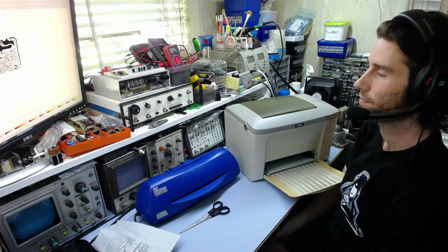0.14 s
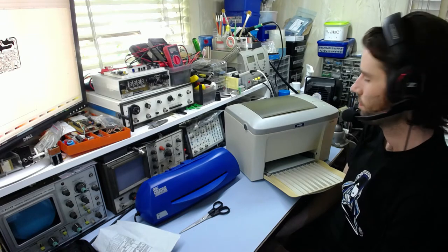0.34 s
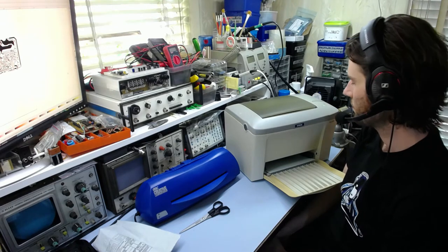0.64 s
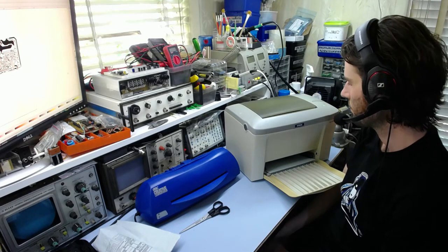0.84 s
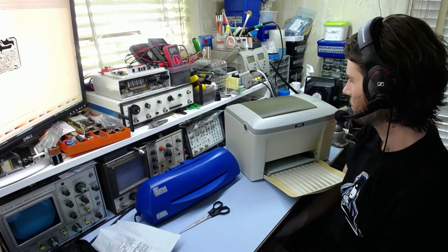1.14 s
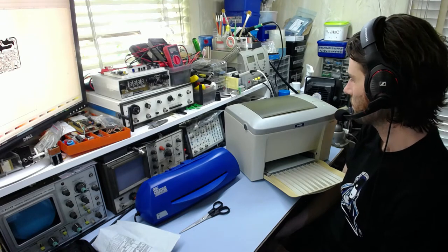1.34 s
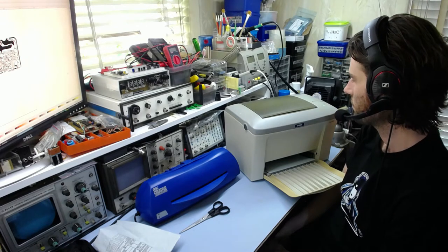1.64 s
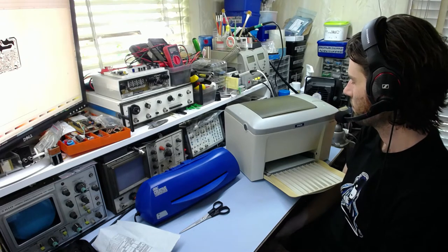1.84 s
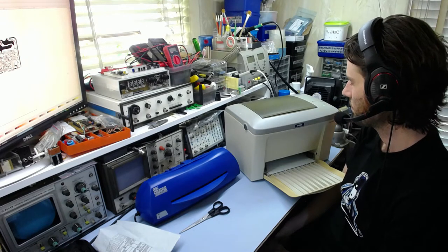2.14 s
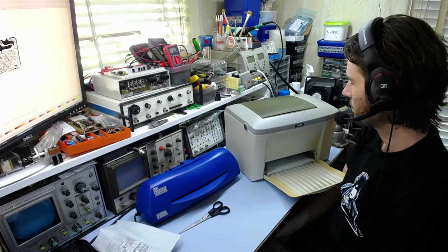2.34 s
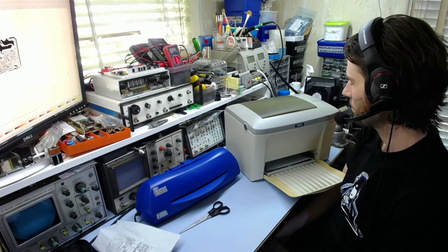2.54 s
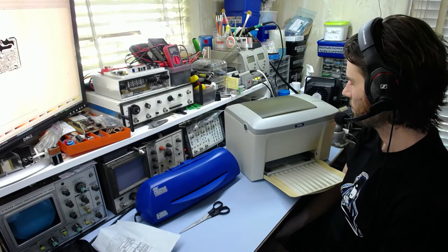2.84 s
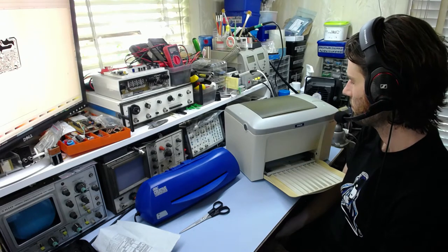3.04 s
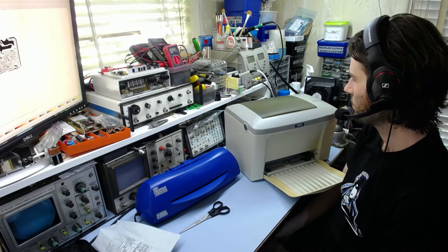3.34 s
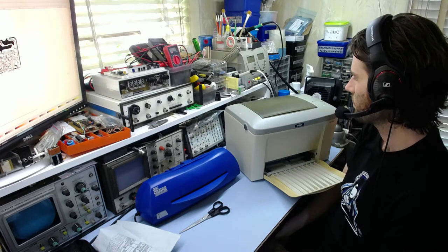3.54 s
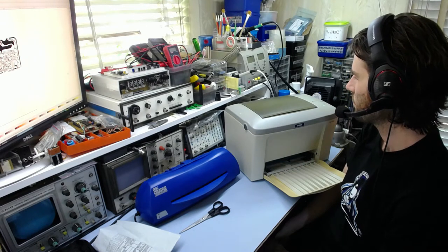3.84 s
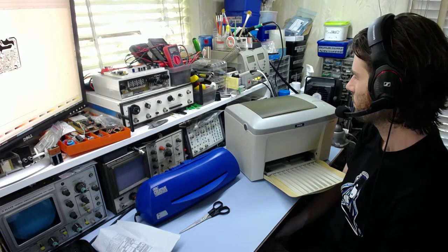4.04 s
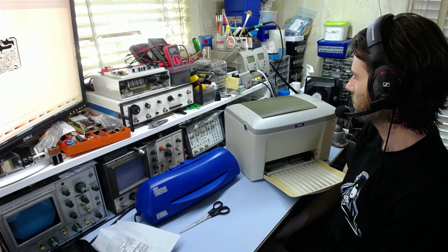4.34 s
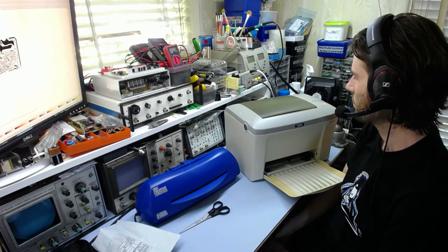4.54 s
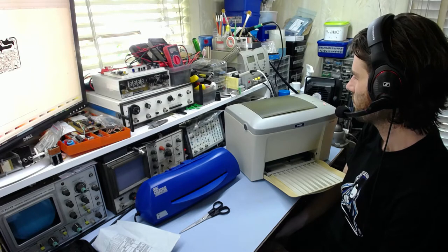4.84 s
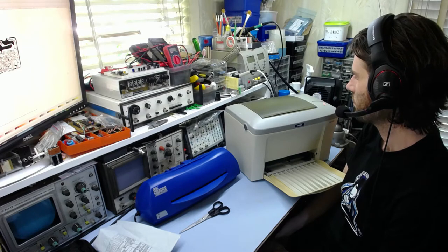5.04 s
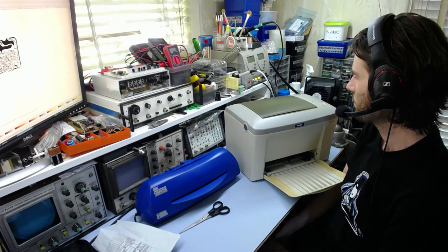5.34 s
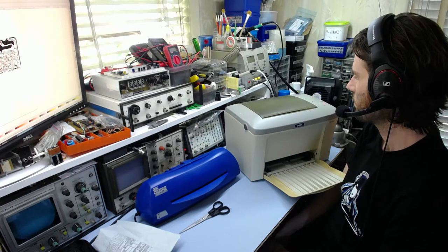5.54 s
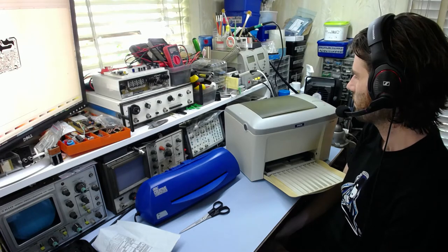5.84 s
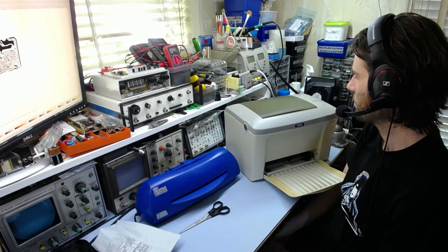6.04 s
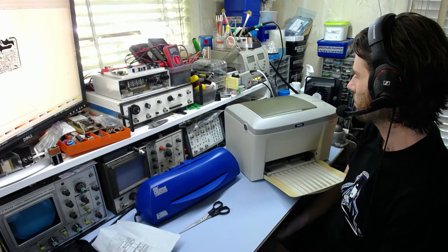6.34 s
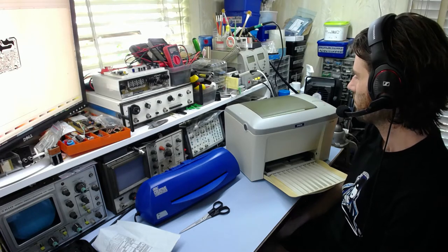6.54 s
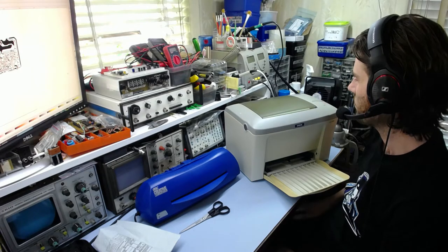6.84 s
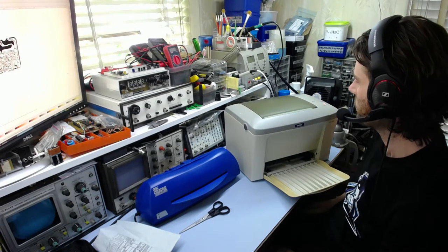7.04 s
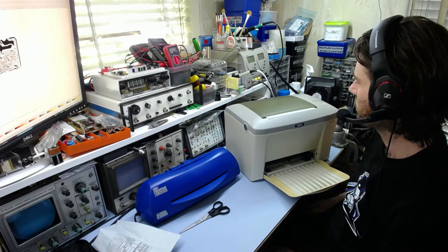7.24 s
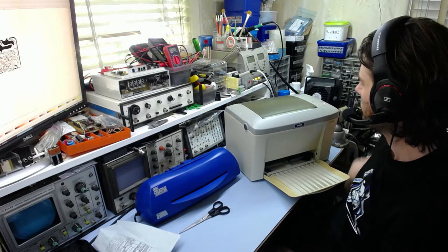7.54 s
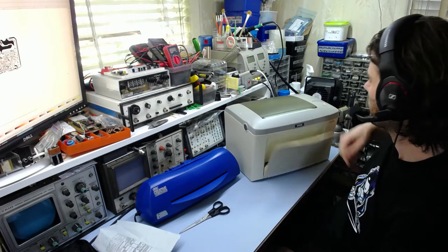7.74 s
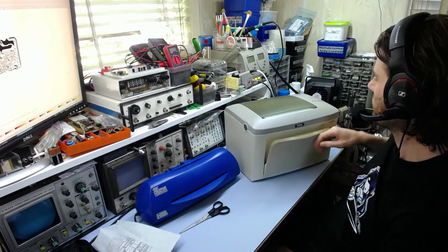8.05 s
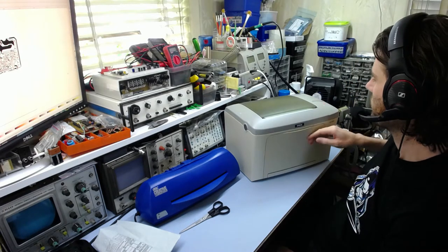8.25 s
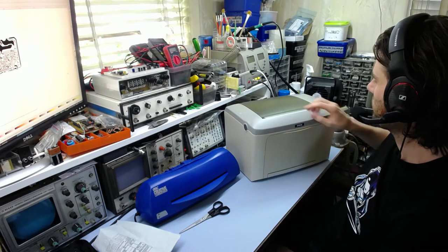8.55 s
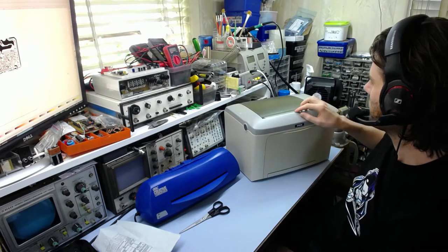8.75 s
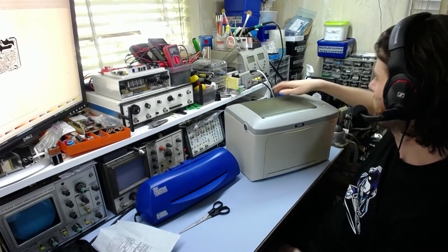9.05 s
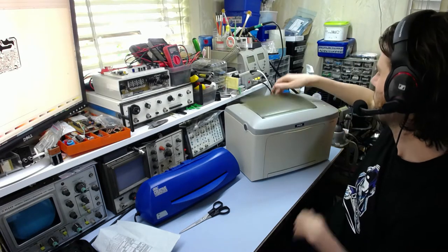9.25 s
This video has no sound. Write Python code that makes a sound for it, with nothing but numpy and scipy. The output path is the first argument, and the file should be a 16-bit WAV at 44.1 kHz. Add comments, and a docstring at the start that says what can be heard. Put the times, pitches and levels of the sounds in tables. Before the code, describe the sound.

Steady motor whine and airy whirr of a desktop printer with scattered feed clicks; a plastic tray is folded up with a loud clack.

```python
"""Small laser printer on a workbench

In a quiet room a motor drops onto a steady whine, a fan blows, gears and rollers churn, and the feed
mechanism clicks as a sheet goes through. Near the end a hand folds the plastic tray up: it scrapes,
rattles and snaps shut; the gears sink back, whine and fan run on. The whine is wavering harmonics, the
running noise is coloured hiss, and clicks and knocks are contact bursts that ring the plastic case."""
import sys
import numpy as np
from scipy import signal
from scipy.fft import rfft, irfft, next_fast_len
from scipy.io import wavfile
from scipy.ndimage import uniform_filter1d

SR = 44100
rng = np.random.default_rng(int(sys.argv[2]) if len(sys.argv) > 2 else 0)


def bounce(signal):
    """Save signal as a 16-bit WAV file at the path given by the first command-line argument."""
    frames = np.transpose(np.atleast_2d(signal))
    limited = np.clip(frames, -1, 1)
    pcm = np.round(limited * 32767).astype(np.int16)
    wavfile.write(sys.argv[1], SR, pcm)


N = 414981
TIME = np.arange(N) / SR

# Stages of the print job: (starts to rise s, starts to fall s, rise time s, fall time s).
MOTOR_ON = (0.11, 9.23, 0.26, 1.6)
GEARS_ON = (0.27, 7.5, 0.25, 0.99)
FEED_ON = (1.45, 8.2, 2.1, 0.28)
SHEET_PULLED = (2.82, 3.7, 0.18, 0.4)
SHEET_DRAGGING = (4.6, 6.05, 0.27, 1.0)


def gain_of(db):
    """Decibels to amplitude."""
    return 10 ** (np.asarray(db) / 20)


def evened(x):
    """Scales to rms 1."""
    return x / np.sqrt(np.mean(x ** 2) + 1e-20)


def read(points, hz):
    """Reads a spectrum table on a log-frequency axis."""
    f, value = np.transpose(points)
    return np.interp(np.log(hz + 0.12), np.log(f), value)


def active(start, stop, rise_s, fall_s):
    """Rises from 0 to 1 after start, holds, and falls back after stop."""
    rise = (TIME - start) / rise_s
    fall = 1 - (TIME - stop) / fall_s
    return np.clip(np.minimum(rise, fall), 0, 1)


def worked(work_db, rest_db, stage):
    """Level in dB of a part that works during one stage and rests otherwise."""
    return rest_db + (work_db - rest_db) * active(*stage)


def add(mix, s, sound):
    """Mixes a sound in at time s."""
    part = mix[round(s * SR):][:len(sound)]
    part += sound[:len(part)]


def wander(per_s):
    """Random drift of rms 1, straight lines between per_s random points a second."""
    return evened(np.interp(TIME * per_s, np.arange(4096), rng.standard_normal(4096)))


def noise(db_at):
    """Noise whose level in dB per Hz follows a function of frequency."""
    size = next_fast_len(N)
    hz = np.fft.rfftfreq(size, 1 / SR)
    spectrum = rfft(rng.standard_normal(size)) * gain_of(db_at(hz))
    return irfft(spectrum, size)[:N] * np.sqrt(SR / 2)


def coloured(x, db_at, size=2048):
    """Minimum-phase filter: it only smears forward in time, so attacks stay sharp."""
    log_gain = np.log(gain_of(db_at(abs(np.fft.fftfreq(size, 1 / SR)))))
    taps = np.fft.ifft(np.exp(np.conj(signal.hilbert(log_gain)))).real
    # of the response and its time reversal, keep the one with its energy early
    reversed_taps = np.roll(taps[::-1], 1)
    taps = max(taps, reversed_taps, key=lambda h: np.sum(h[:size // 2] ** 2))
    return signal.oaconvolve(x, taps[:size // 2])[:len(x)]


# Harmonics 1 to 3 of the whine. Each row: base level in dB, change in dB while the gears are on,
# change in dB while the sheet is pulled, change in dB while it drags.
WHINE_HARMONICS = [(-67.5, 1.5, 0.7, -3), (-76.5, 4, 5, 1), (-71, -3.5, 1.5, 1)]


def motor(waver=0.001254, flutter=0.083, overtone_flutter=0.14, mesh_flutter=0.6):
    """Motor harmonics glide from an overshoot to a locked pitch and shift with load; a gear tone joins."""
    overshoot_hz, lock_hz, settle_s = 950, 750, 0.12
    overshoot_db, overshoot_fade_s = -68.5, 0.089
    motor_off_db = -12  # how much weaker the whine is before the motor drives
    hz = np.interp(TIME, [0, settle_s], [overshoot_hz, lock_hz])
    turn = 2 * np.pi * np.cumsum(hz * (1 + waver * wander(25))) / SR

    whine = gain_of(overshoot_db) * np.exp(-(TIME / overshoot_fade_s) ** 2) * np.sin(turn)
    for k, (db, gears_db, pull_db, drag_db) in enumerate(WHINE_HARMONICS, 1):
        load_db = gears_db * active(*GEARS_ON)
        load_db += pull_db * active(*SHEET_PULLED) + drag_db * active(*SHEET_DRAGGING)
        level = gain_of(db + load_db + motor_off_db * (1 - active(*MOTOR_ON)))
        depth = flutter if k == 1 else overtone_flutter
        whine = whine + level * (1 + depth * wander(30)) * np.sin(k * turn)

    # the high gear tone quietens as the rollers take up the load
    mesh_sag_db = -3.5
    mesh_level = gain_of(worked(-83, -98, GEARS_ON) + mesh_sag_db * active(*FEED_ON))
    mesh = mesh_level * (1 + mesh_flutter * wander(60)) * np.sin(11.97 * turn)
    return np.sqrt(2) * (whine + mesh)


# Resonances and dips of the housing that colour the running noise.
# Each row: centre in Hz, width in Hz, lift in dB.
HOUSING_MODES = [(355, 24, 3.5), (497, 11, 3.5), (605, 27, 6), (1105, 34, 4), (1234, 44, -1.5),
                 (1534, 71, 1.5), (2300, 140, 2.5), (2523, 36, 4.5), (3004, 44, 6.5), (3420, 39, 6),
                 (4050, 80, 1), (4920, 170, 2), (6130, 51, 6.5), (7900, 45, -1)]


def housed(spectrum):
    """Running noise heard through the resonances of the housing."""
    def db_at(hz):
        lift = sum(db / (1 + (2 * (hz - f) / width) ** 2) for f, width, db in HOUSING_MODES)
        return read(spectrum, hz) + lift
    return noise(db_at)


# Gear churn. Each row: frequency in Hz, density in dB per Hz before housing and level changes.
GEAR_SPECTRUM = [(100, -112), (500, -106), (900, -103), (1450, -98.5), (2000, -99), (3100, -99.5),
                 (4300, -106), (5400, -106), (6200, -103), (7300, -108), (9000, -105.5), (10500, -113),
                 (15500, -117)]


def gears(chatter_db=1.5):
    """Gear teeth churn as chattering hiss, a little quieter once the rollers take up the load."""
    sag_db = -1.2 * active(*FEED_ON)
    return housed(GEAR_SPECTRUM) * gain_of(worked(0, -10, GEARS_ON) + sag_db + chatter_db * wander(150))


# Feed rollers. Each row: frequency in Hz, density in dB per Hz before housing and level changes.
FEED_SPECTRUM = [(200, -112), (1500, -104), (2400, -99), (3400, -101), (4100, -99.5), (5000, -99),
                 (5800, -112), (7500, -114), (10000, -110), (12000, -114), (15500, -125)]


def feed(drag_db=1.1):
    """Feed rollers make a hiss that swells in slowly and wavers in level."""
    return housed(FEED_SPECTRUM) * gain_of(worked(-0.83, -10.5, FEED_ON) + drag_db * wander(25))


# Roller brush. Each row: frequency in Hz, density in dB per Hz before housing and swells.
BRUSH_SPECTRUM = [(3000, -135), (5200, -114), (6300, -103), (7400, -103), (8600, -114), (12000, -130)]
# Strength of the brush on successive roller turns. Each entry: gain in dB.
BRUSH_TURNS = [2.5, -1, -9, 0, -1]


def brushing(first_s=0.28, turn_s=0.58, width_s=0.09):
    """A roller brushes once in every turn until the sheet arrives, each time a soft swell of hiss."""
    swells = np.zeros(N)
    for k, db in enumerate(BRUSH_TURNS):
        centre_s = first_s + k * turn_s
        swells += gain_of(db) * np.exp(-((TIME - centre_s) / width_s) ** 2 / 2)
    return housed(BRUSH_SPECTRUM) * swells


# Thin sliding hiss. Each row: frequency in Hz, density in dB per Hz before housing and level.
SLIDE_SPECTRUM = [(5000, -135), (8500, -120), (9800, -108), (10800, -110), (12000, -118), (14300, -117),
                  (15500, -126)]


def sliding(level_db=-20):
    """A very faint, thin high hiss at a steady level throughout."""
    return housed(SLIDE_SPECTRUM) * gain_of(level_db)


def drifting(x):
    """The colour of a hiss drifts in patches about a kilohertz wide and half a second long."""
    z = signal.stft(x, nperseg=1024)[2]
    patches = uniform_filter1d(rng.standard_normal(z.shape), size=24, axis=0)
    patches = evened(uniform_filter1d(patches, size=40, axis=1))
    return signal.istft(z * gain_of(1.3 * patches), nperseg=1024)[1][:N]


# Fan air. Each row: frequency in Hz, density in dB per Hz before housing and level changes.
FAN_SPECTRUM = [(30, -105), (130, -95), (280, -98), (450, -101.5), (800, -101), (1150, -95), (1950, -101.5),
                (2600, -97), (4000, -100), (5000, -102), (7200, -110), (8300, -105.5), (10000, -115),
                (15500, -120)]


def fan(start_db=-2, rise_db_per_s=0.2133):
    """Moving air as steady broadband noise that grows slightly louder."""
    return housed(FAN_SPECTRUM) * gain_of(start_db + rise_db_per_s * TIME)


# Modes of the plastic case. Each row: frequency in Hz, bandwidth in Hz, relative level in dB
# (the starting amplitude is also scaled by the bandwidth).
CASE_MODES = [(285, 25, -15), (517, 22, -15), (608, 30, -13), (904, 60, -12), (1040, 30, -13),
              (1300, 35, -11), (2016, 28, -1), (2275, 25, -3), (2445, 40, 0), (2675, 46, -3),
              (2935, 60, -2), (3290, 90, -5), (3458, 45, -2), (3947, 40, -7), (4698, 42, -1),
              (4960, 70, -5), (5060, 35, -4), (5340, 70, -3), (5641, 40, -7), (6710, 47, -13),
              (7710, 80, -15)]


def case_ring():
    """The decaying modes of the case after one blow; each blow meets them in another phase."""
    t = np.arange(SR // 4) / SR
    ring = np.zeros(len(t))
    for hz, width, db in CASE_MODES:
        decay = np.exp(-np.pi * width * t)
        ring += width * gain_of(db) * decay * np.sin(2 * np.pi * (hz * t + rng.random()))
    return ring


# Colour of a blow on the case. Each row: frequency in Hz, relative level in dB.
BLOW_COLOUR = [(59, -49), (100, -11.5), (166, -28), (287, -12.5), (447, -17.5), (614, -10), (697, -21),
               (791, -7), (1310, -6.5), (1620, -6), (2520, -3), (5170, -4.5), (6260, -13.5), (9340, -17),
               (15500, -28)]


def blows(rows, snap, ring_db, level_db, sharpness=1.73, rise_s=0.00096, rattle_db=-21, rattle_s=0.032):
    """Each blow is a short burst of plastic contacts that rings the case; loose parts rattle after it."""
    out, t = np.zeros(N), np.arange(SR // 4) / SR
    for s, db, bass_db, treble_db, decay_s, own_hz, own_db in rows:
        envelope = np.exp(-t / decay_s) * (1 - np.exp(-t / rise_s))
        contact = evened(rng.standard_normal(len(t)) * envelope)
        contact += snap * evened(signal.unit_impulse(len(t), SR // 2000))
        bounces = rng.standard_normal(len(t)) * (rng.random(len(t)) < 600 / SR)
        contact += gain_of(rattle_db) * evened(bounces * t * np.exp(-t / rattle_s))
        sound = evened(coloured(contact, lambda hz: read(BLOW_COLOUR, hz)))
        sound = sound + gain_of(ring_db) * evened(case_ring())

        def tone_db(hz):
            # heavy parts add bass, hard contacts treble, and the struck part has its own resonance
            bass = bass_db / (1 + (hz / 900) ** 6)
            treble = treble_db * np.sqrt(hz / 9000) / (1 + (6000 / (hz + 1)) ** 8)
            own = own_db / (1 + (2 * sharpness * (hz / own_hz - 1)) ** 2)
            return bass + treble + own

        sound = coloured(sound, tone_db)
        loudest = np.sqrt(uniform_filter1d(sound ** 2, size=176).max())  # rms of the loudest 4 ms
        add(out, s, gain_of(db + level_db) * sound / loudest)
    return out


# Clicks of the mechanism, the last one the tray leaving its catch. Each row: start in seconds,
# level in dB before the common lift, bass lift in dB, treble lift in dB near 9 kHz,
# own resonance in Hz, its lift in dB.
MECHANISM_CLICKS = [(1.9497, -39.5, 3, -3, 1450, 18), (1.958, -47, -12, -5, 1250, 14),
                    (2.1417, -55.5, -4, 9, 5800, 10), (2.1632, -47, 2, -2, 1600, 5),
                    (2.1987, -40.5, -14, 6, 2200, 0), (3.0139, -49.5, 5, -6, 1870, 10),
                    (3.0549, -41.5, -7, -4.5, 1130, 7.5), (3.07, -50, 16, -2, 3160, 1),
                    (3.4237, -49.5, 1, -5, 3630, 9), (3.6694, -49, -5, 8, 4800, 4),
                    (4.391, -50.5, -5, 8, 1400, 11), (4.523, -51, 0, 0, 2400, 4),
                    (4.5417, -38, 3.5, 2.5, 526, 5), (4.7128, -48, -2, 6, 4930, 6),
                    (5.0063, -45.5, 3.5, 8, 490, 11), (5.0542, -44, 2, 11, 1240, 8),
                    (5.2892, -45, 11, 2, 2100, 8.5), (5.4268, -53, 3, -6, 2980, 11),
                    (6.1959, -48, 3, -6, 6730, 13), (6.8682, -52, -7.5, -4, 4030, 5),
                    (7.6913, -37.5, 4, 10.5, 4540, 5.5)]


def mechanism(decay_s=0.004):
    """Levers and catches click, each with its own weight, hardness and pitch."""
    rows = [(s, db, bass_db, treble_db, decay_s, hz, own_db)
            for s, db, bass_db, treble_db, hz, own_db in MECHANISM_CLICKS]
    return blows(rows, snap=0.2, ring_db=-10, level_db=2.5)


# Knocks of the tray as it is grasped and swung, the last three its latch.
# Each row: start in seconds, level in dB before the common lift, contact decay in seconds.
TRAY_KNOCKS = [(7.301, -48.5, 0.011), (7.3878, -42, .019), (7.456, -52.5, .004), (7.7075, -49, 0.006),
               (7.7435, -40.5, 0.0072), (7.759, -40.5, 0.0038), (7.779, -39, 0.0051),
               (7.7916, -30.5, 0.0014), (7.812, -39, 0.0031), (7.8222, -34, 0.0042), (7.886, -39.5, 0.0049),
               (7.901, -43.5, 0.0026), (7.9933, -42.5, 0.017), (8.058, -36, 0.0044),
               (8.0615, -34.5, 0.0055), (8.0894, -36.5, 0.0023), (8.2243, -45.5, .005),
               (8.2451, -23.5, 0.0073), (8.2515, -25.5, 0.0037), (8.266, -30.5, 0.0086)]


def knocking(reference_db=-31.5, tray_hz=2800, tray_resonance_db=2):
    """The tray knocks against the case, fuller and brighter the harder it hits."""
    rows = []
    for s, db, decay_s in TRAY_KNOCKS:
        harder_db = db - reference_db
        bass_db = -3.3 + 0.61 * harder_db
        treble_db = -0.93 + 0.95 * harder_db
        rows.append((s, db, bass_db, treble_db, decay_s, tray_hz, tray_resonance_db))
    return blows(rows, snap=0.21, ring_db=-0.5, level_db=1.5)


# Colour of the tray scraping in its hinge. Each row: frequency in Hz, relative level in dB.
SCRAPE_COLOUR = [(88, -48), (150, -18), (404, 5), (618, -5), (681, -29), (736, -12), (948, -22), (1040, 9),
                 (1370, -8), (2410, 5), (4220, 2), (4750, 6), (7000, -27), (7860, -7), (15500, -58)]
# Pushes of the hand that make the hinge scrape.
# Each row: starts to rise in seconds, starts to fall in seconds, scrape level in dB.
HAND_PUSHES = [(7.37, 7.438, -62), (7.685, 7.842, -46), (7.989, 8.0, -54), (8.045, 8.082, -49)]


def hinge(slips_per_s=500, spread_db=4, ring_db=-11, rise_s=0.014, fall_s=0.041):
    """Tiny slips of plastic on plastic as the tray swings; they ring the case too."""
    slips = (rng.random(N) < slips_per_s / SR) * rng.choice([-1, 1], N)
    slips = slips * gain_of(spread_db * np.minimum(rng.exponential(1, N), 3))
    scrape = evened(coloured(slips, lambda hz: read(SCRAPE_COLOUR, hz)))
    ring = evened(signal.oaconvolve(slips, case_ring())[:N])
    pushing = sum(gain_of(db) * active(start, stop, rise_s, fall_s) for start, stop, db in HAND_PUSHES)
    return (scrape + gain_of(ring_db) * ring) * pushing


# Decay of the room. Each row: frequency in Hz, time to fall by 60 dB in seconds.
ROOM_DECAY = [(150, 0.29), (700, 0.29), (3000, 0.21), (6000, 0.17), (12000, 0.12)]


def room(x, build_s=0.0012):
    """Dense reflections off the crowded bench, each band dying at its own speed."""
    t = np.arange(SR // 2) / SR
    taps = rng.choice([-1., 1.], len(t)) * (rng.random(len(t)) < 4000 / SR)
    taps = taps * (1 - np.exp(-(t / build_s) ** 2))
    hz, frame_s, z = signal.stft(taps, SR, nperseg=256)
    decay = gain_of(-60 * frame_s / read(ROOM_DECAY, hz)[:, None])
    tail = signal.istft(z * decay, SR, nperseg=256)[1]
    return signal.oaconvolve(x, tail / np.linalg.norm(tail))[:N]


# Low-frequency drift. Each row: frequency in Hz, density in dB per Hz before the level wanders.
LOW_DRIFT_SPECTRUM = [(1, -62), (4, -66), (15, -66.5), (30, -81.5), (42, -83.5), (70, -88), (110, -103),
                      (300, -112), (1000, -135)]


def background(hum_db=-68.5, lumpy_db=2):
    """Low-frequency drift, mostly below hearing and unsteady in level, and a 50 Hz mains hum."""
    low_drift = noise(lambda hz: read(LOW_DRIFT_SPECTRUM, hz)) * gain_of(lumpy_db * wander(2.89))
    return low_drift + np.sqrt(2) * gain_of(hum_db) * np.sin(2 * np.pi * 50 * TIME)


# Filter that leaves mainly treble in the side signal. Each row: frequency in Hz, gain in dB.
SIDE_COLOUR = [(2600, -61), (3600, -55), (4500, -55), (6000, -28), (8000, -13.5), (12000, -2.5),
               (15500, -5)]


def scene():
    """The printer is in the centre; a faint treble hiss widens the stereo image."""
    clicks, tray = mechanism(), knocking() + hinge()
    running = motor() + fan() + drifting(gears() + feed() + brushing() + sliding())
    echoes = room(gain_of(-7.5) * clicks + gain_of(-10) * tray)
    mid = running + background() + clicks + tray + echoes
    diffuse = room(running + gain_of(-6.5) * (clicks + tray))
    side = coloured(diffuse, lambda hz: read(SIDE_COLOUR, hz))
    return np.array([mid + side, mid - side])


def record(dry):
    """A steep low-pass removes the top of the treble."""
    edge_hz = 15780
    taps = signal.firwin(511, edge_hz, window=("kaiser", 9), fs=SR)
    return signal.oaconvolve(dry, taps[None], "same")


dry = scene()
out = record(dry)
bounce(out)
```